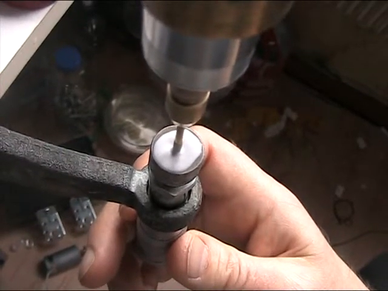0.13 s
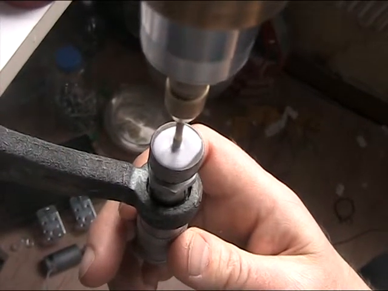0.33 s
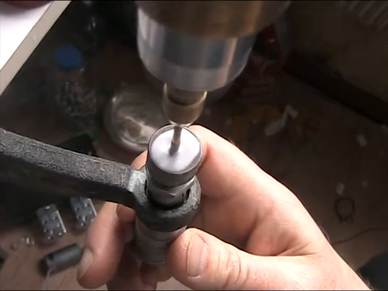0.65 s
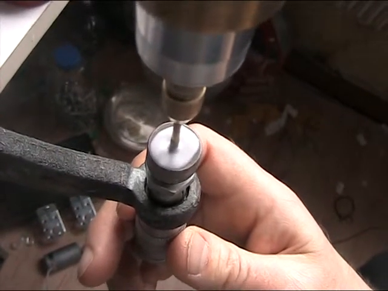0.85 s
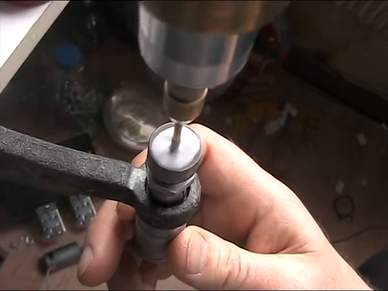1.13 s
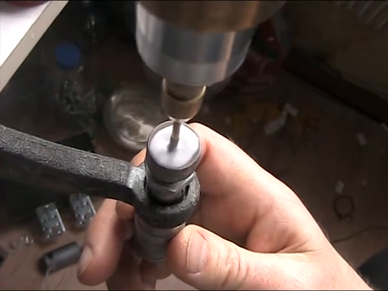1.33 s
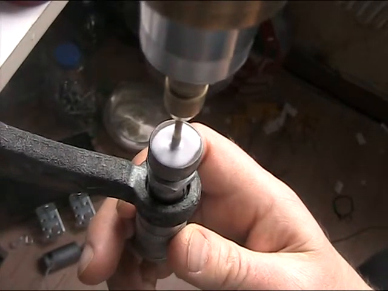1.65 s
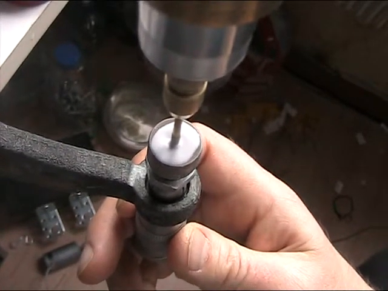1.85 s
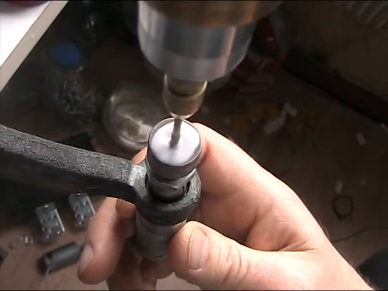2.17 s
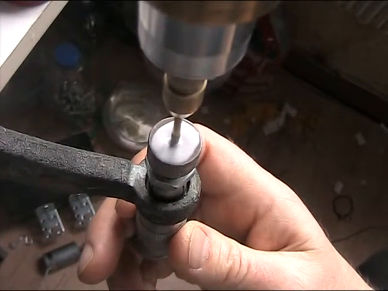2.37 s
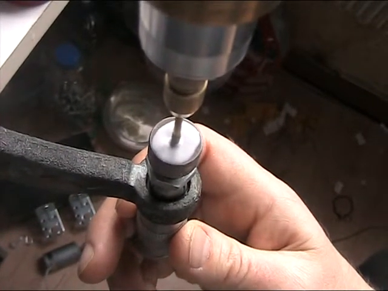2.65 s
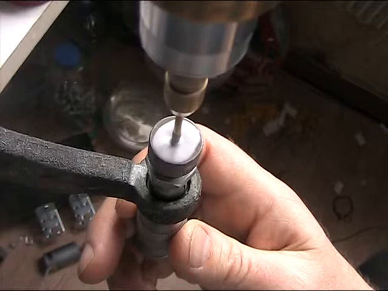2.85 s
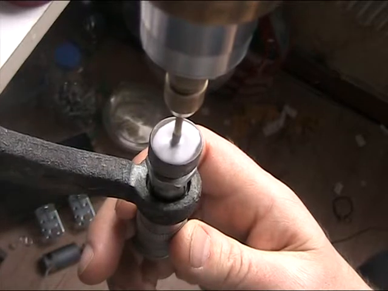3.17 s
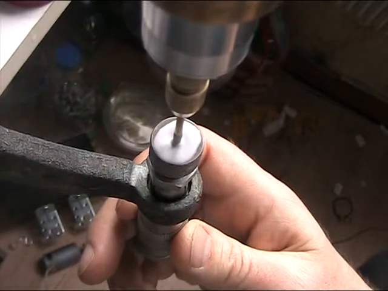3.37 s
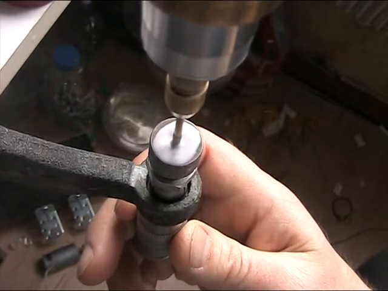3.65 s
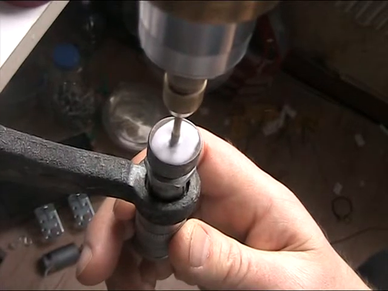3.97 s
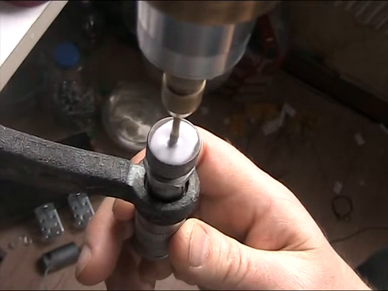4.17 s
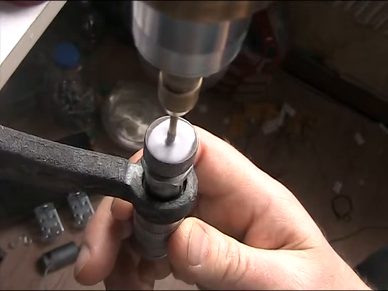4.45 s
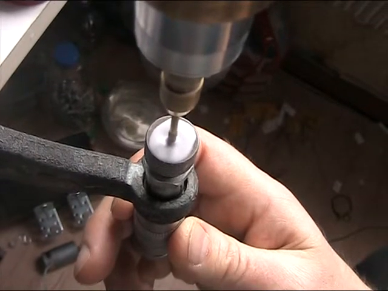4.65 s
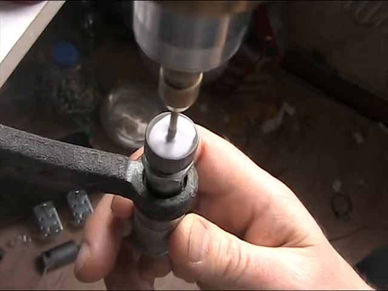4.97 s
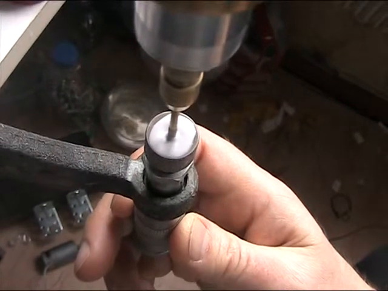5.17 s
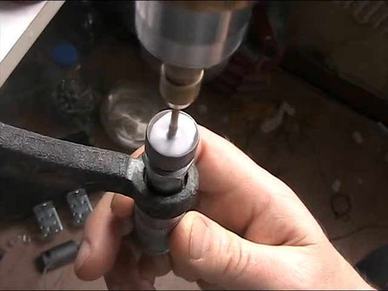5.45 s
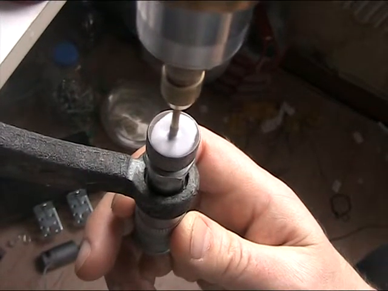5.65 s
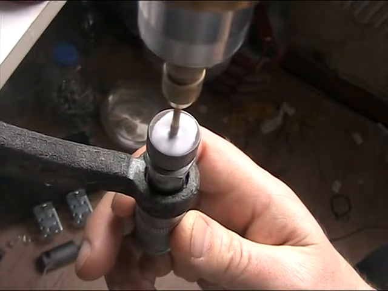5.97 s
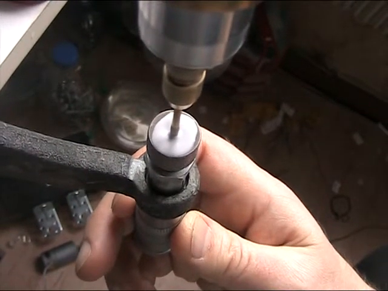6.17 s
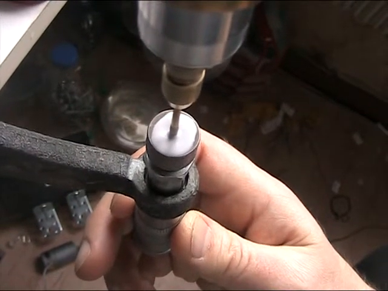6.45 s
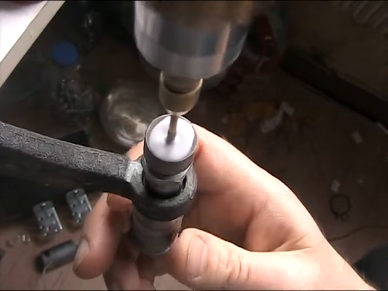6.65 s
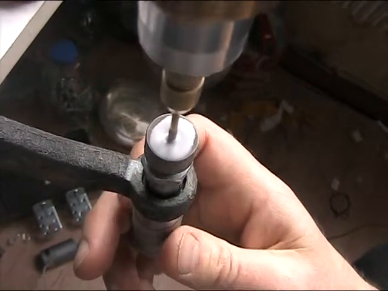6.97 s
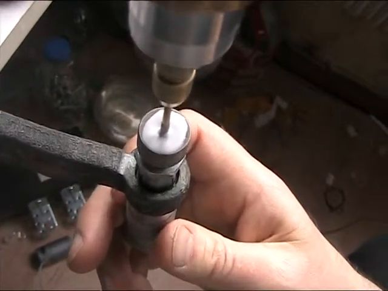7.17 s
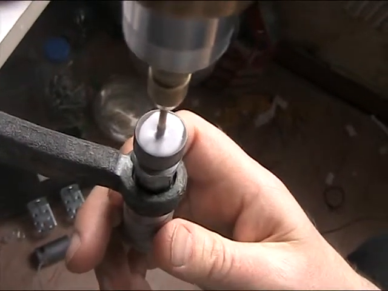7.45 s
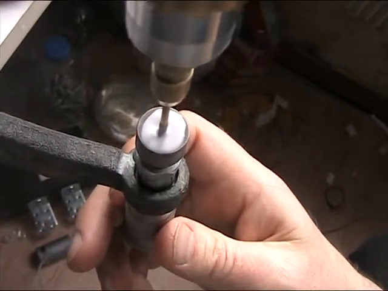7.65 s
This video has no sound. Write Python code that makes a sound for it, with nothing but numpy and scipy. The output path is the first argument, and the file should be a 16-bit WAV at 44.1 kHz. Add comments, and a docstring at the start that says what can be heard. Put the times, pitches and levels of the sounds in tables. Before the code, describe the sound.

A small high-speed drill grinds steadily against stone, a gritty high hiss and thin ringing over a low motor hum.

```python
"""Small drill grinding stone, close up.

A high-speed drill grinds a stone in a water cup on a clamp arm, heard in stereo. The spindle hums at its
turning rate and multiples. Abrasive grains strike the stone in a dense stream, harder on part of each
turn, and ring the chuck, cup and arm. Mains hum lies far below."""
import sys
import numpy as np
from scipy import signal
from scipy.fft import rfft, irfft, next_fast_len
from scipy.io import wavfile

SR = 44100
rng = np.random.default_rng(int(sys.argv[2]) if len(sys.argv) > 2 else 0)


def unload_wav(signal):
    """Save mono or channel-first audio to the path in sys.argv[1] as 16-bit WAV at rate SR, clipped to [-1, 1]."""
    wavfile.write(
        sys.argv[1],
        SR,
        np.round(np.clip(np.atleast_2d(signal).T, -1, 1) * 32767).astype(np.int16),
    )


N = 344509


def amp(db):
    """dB to gain."""
    return 10 ** (np.asarray(db) / 20)


def unit_rms(x):
    """Scale to rms 1."""
    return x / np.sqrt(np.mean(x ** 2) + 1e-20)


def in_time(rows):
    """Columns of a time table, one value per sample."""
    times_s, *columns = np.transpose(rows)
    return [np.interp(np.arange(N) / SR, times_s, column) for column in columns]


def at_hz(rows, hz):
    """Read a table on a log-frequency axis."""
    table_hz, values = np.transpose(rows)
    return np.interp(np.log(hz + 1), np.log(table_hz + 1), values)


def drift(corner_hz):
    """Low-passed random wander, rms 1."""
    hop = 20
    pole = np.exp(-2 * np.pi * corner_hz * hop / SR)
    noise = rng.standard_normal(N // hop + 4002)
    slow = signal.lfilter([1], [1, -2 * pole, pole * pole], noise)[4000:]
    return np.interp(np.arange(N) / hop, np.arange(len(slow)), unit_rms(slow))


def spells(rows, floor_db, edge_s=0.21):
    """Level in dB that swells from a floor, holds and falls back for each row."""
    t = np.arange(N) / SR
    gain = np.full(N, amp(floor_db))
    for start_s, length_s, level_db in rows:
        inside_s = np.minimum(t - start_s, start_s + length_s - t)
        gain = np.maximum(gain, amp(level_db) * np.clip(inside_s / edge_s + 0.5, 0, 1))
    return 20 * np.log10(gain)


def stereo_gains(pan_db, lead_rad):
    """Complex left and right gains."""
    left = amp(pan_db / 2) * np.exp(0.5j * lead_rad)
    return np.array([left, 1 / left])


# Stereo balance: (frequency [Hz], left minus right [dB])
PAN = [(100, -3), (200, -7), (600, -3.5), (3000, -1), (7500, 0), (12500, -2), (13500, -5), (15000, 1.5)]
# Stereo phase: (frequency [Hz], left lead [rad])
LEAD = [(200, -.6), (800, -.1), (1100, .5), (1600, 0), (4800, 0), (5500, .6), (7600, 0), (8300, .8),
        (10300, 0), (12500, .2), (13700, .9), (15500, .7)]


def direct_path(hz):
    """Stereo gains of the direct sound."""
    return stereo_gains(at_hz(PAN, hz), at_hz(LEAD, hz))


def tone(phase, hz, level_db):
    """Stereo sine, placed by its frequency."""
    return np.sqrt(2) * amp(level_db) * np.real(direct_path(hz)[:, None] * np.exp(1j * phase))


# Supply hum lines: (frequency [Hz], level [dB])
MAINS = [(50, -67), (100, -71), (500, -59.5)]


def mains_hum():
    """Faint, unsteady hum of the motor supply."""
    t = np.arange(N) / SR
    return sum(tone(2 * np.pi * hz * t + 0.8 * drift(6), hz, level_db + 3 * drift(8))
               for hz, level_db in MAINS)


# Hum harmonics: (multiple of the turning rate)
HARMONICS = [2, 3, 4, 5, 6, 7, 14, 16]
# Floor of each harmonic: (level [dB])
HARMONIC_FLOORS_DB = [-49.5, -54, -54, -54, -50, -53, -52.5, -47]
# Spells in which a harmonic sings out, by multiple: (start [s], length [s], level [dB])
HARMONIC_SPELLS = {"2": [(0, 0.57, -45), (1.05, .15, -44), (1.5, 1, -48), (2.7, 0.76, -46.5),
                   (4.1, 1.2, -46), (5.55, 2.3, -47)], "3": [(.09, .62, -43.7), (1.04, 0.25, -43.5),
                   (2.55, 0.35, -45), (3.31, 0.6, -46), (4.43, 0.47, -48), (5.41, 0.37, -48),
                   (6.48, 0.64, -49.2), (7.31, 0.68, -43)], "4": [(.08, 0.53, -45.5), (1.42, .78, -48),
                   (3.64, 0.26, -42.5), (5.21, .28, -46), (6.02, 1.15, -48.5), (7.46, .52, -44.2)],
                   "5": [(0, 0.74, -43.5), (.91, 0.51, -48), (1.54, 0.17, -48.7), (3.81, .44, -48),
                   (4.74, 0.64, -46), (5.54, 0.16, -42), (7.46, .52, -45)], "6": [(.11, 0.48, -45.2),
                   (.76, 0.4, -43), (2.12, 0.86, -43), (3.31, .29, -43), (3.61, 0.17, -35.5),
                   (3.86, 0.31, -43), (4.41, 1, -41.5), (5.7, 0.29, -37.5), (5.5, 0.41, -45.5),
                   (6.33, 0.64, -39), (7.46, 0.24, -42.5)], "7": [(.43, 0.65, -43.5), (2.66, 0.13, -39),
                   (4.58, 0.13, -43), (6.64, .31, -44), (7.61, .32, -43.2)], "16": [(1.45, 1.35, -38),
                   (3.15, .25, -47), (6.4, .55, -45)]}


def spindle_hum(angle, mean_hz, fundamental_db):
    """Unbalance and run-out hum at the turning rate and its multiples."""
    waver_db, flutter_db = 0.68, 1.5
    hum = tone(angle + rng.uniform(0, 2 * np.pi), mean_hz, fundamental_db + waver_db * drift(5.1))
    for k, floor_db in zip(HARMONICS, HARMONIC_FLOORS_DB):
        level_db = spells(HARMONIC_SPELLS.get(str(k), []), floor_db) + waver_db * drift(4)
        phase = k * angle + rng.uniform(0, 2 * np.pi)
        hum += tone(phase, k * mean_hz, level_db + (k > 2) * flutter_db * drift(27))
    return hum


# Swells of the low rasp: (start [s], length [s], level [dB])
LOW_RASP_SPELLS = [(0, 0.32, -46), (.42, .28, -41.5), (1.4, 0.88, -46), (3.0, 0.46, -44),
                   (4.05, 0.18, -43.5), (4.74, 0.12, -42), (5.2, 0.59, -48), (6.5, .13, -39),
                   (7.3, .6, -44)]
# The bit bites, the high rasp flares: (start [s], length [s], level [dB])
BITES = [(.1, 0.16, -42), (.42, 0.27, -46), (.95, 0.31, -41), (2.02, 0.11, -44), (3.45, 0.49, -43),
         (4.3, 0.27, -44), (4.75, 0.2, -47), (5.2, .16, -36), (5.85, 0.18, -45), (6.2, 0.33, -45.5),
         (6.68, .08, -46), (6.78, 0.057, -34), (6.85, .08, -44), (7.72, .2, -39.5)]


def spindle_rasp(angle, mean_hz):
    """Upper multiples of the turning rate rasp, wavering in phase and level."""
    low_db = spells(LOW_RASP_SPELLS, floor_db=-51)
    high_db = spells(BITES, floor_db=-61.5, edge_s=0.048)
    return sum(tone(k * angle + 0.68 * drift(22), k * mean_hz, level_db + 1.9 * drift(14))
               for multiples, level_db in (((8, 9), low_db), ((10, 11, 12), high_db))
               for k in multiples)


# Modes of chuck, cup and arm: (frequency [Hz])
MODES_HZ = [2360, 3095, 3180, 3890, 4945, 5480, 5975, 6236, 6735, 7197, 8000, 8322, 8700, 9726, 10265,
            11684]
# Per mode: (width [Hz], relative gain [dB], left minus right [dB], left lead [rad])
MODE_SHAPES = [(164, -9, 1.5, .1), (70, -17.5, -19, 0.48), (80, -3, 1, 0.4), (49, -8.5, -5, .1),
               (18, 1, -4, .2), (218, 1, -3.5, 0.66), (89, 0.5, 2, 0.39), (63, 3.5, -8, 1.16),
               (25, -2, -9, .2), (47, -5, 9, 0.92), (160, -7, 6.5, 0.88), (154, -3.5, -6, 1.1),
               (191, -18, 15, 1.1), (25, 3.5, 2.5, 1.6), (96, -8, -9, .1), (35, -8, 20, 4.3)]


def rig_response(hz):
    """Stereo resonances of chuck, cup and arm."""
    opposed_hz, bass_corner_hz = 10265, 690
    response = 0
    for mode_hz, (width_hz, gain_db, pan_db, lead_rad) in zip(MODES_HZ, MODE_SHAPES):
        sign = -1 if mode_hz == opposed_hz else 1   # one mode swings against its neighbours
        gains = sign * amp(gain_db) * stereo_gains(pan_db, lead_rad)
        response += gains[:, None] / (1 + 2j * (hz - mode_hz) / width_hz)
    return response * hz ** 2 / (hz ** 2 + bass_corner_hz ** 2)   # small parts radiate no bass


# Grit spectrum: (frequency [Hz], relative gain [dB])
GRIT = [(40, -49), (100, -25.5), (300, -26.5), (800, -19.5), (1700, -12), (2200, -9.5), (2900, -10.5),
        (4400, -11.5), (5700, -1.5), (7600, -14), (11000, -15), (13500, -9.5), (14500, 0), (15700, -8.5)]
# Scattered share: (frequency [Hz], gain re direct [dB])
SCATTER = [(60, 0), (300, -5.5), (1000, -6), (2000, -29), (4500, -22), (6000, -8), (7600, -17), (9300, -1),
           (11500, -3), (14500, -17)]
# Notches where paths cancel: (frequency [Hz], width [Hz], depth [0-1])
NOTCHES = [(652, 16, 0.73), (1514, 160, 1), (2983, 65, 0.6), (4640, 220, 0.74), (5020, 290, 0.5),
           (9350, 150, 0.3)]


def grit(hz, direct, scattered):
    """Stereo spectrum of strikes heard directly and scattered off the bench."""
    side = amp(at_hz(SCATTER, hz)) * scattered * [[1], [-1]]
    spectrum = amp(at_hz(GRIT, hz)) * (direct_path(hz) * direct + side)
    for notch_hz, width_hz, depth in NOTCHES:
        spectrum *= 1 - depth / (1 + 2j * (hz - notch_hz) / width_hz)
    return spectrum


def proud_grain(angle, above_hz=1860):
    """One protruding grain ticks once a turn, in stronger and weaker runs."""
    passes = np.diff(np.floor(angle / (2 * np.pi)), prepend=0)
    size_db = 11.5 + 3.5 * drift(3.8) + 3.2 * rng.standard_normal(N)
    return signal.sosfilt(signal.butter(2, above_hz, "high", fs=SR, output="sos"), passes * amp(size_db))


def grains(spread_db, strikes_per_s=9000):
    """Abrasive grains strike at random, with uneven force."""
    sizes = amp(spread_db * np.minimum(rng.exponential(1, N), 5))
    signs = rng.choice([-1, 1], N)
    return unit_rms(sizes * signs * (rng.random(N) < strikes_per_s / SR))


# Contact within a turn: (multiple, depth [dB], phase [rad])
TURN_PATTERN = [(1, 1.5, 0.61), (2, 0.26, 2.5), (3, 1.1, 9.9)]


def pressure(angle, surge_db=0.8):
    """The bit presses harder on part of each turn and in short surges."""
    turn_db = sum(depth_db * np.cos(k * angle + phase) for k, depth_db, phase in TURN_PATTERN)
    return amp(turn_db + surge_db * (drift(34) + drift(170)))


# Grinding effort: (time [s], relative level [dB], dull scrape share [dB; -9.5 is neutral])
GRIND = [(0.0, -22.5, -8.5), (0.2, -21, -9.2), (0.45, -19.5, -10.0), (0.63, -20.5, -13.5),
         (0.75, -22.2, -10.5), (1.2, -20.5, -9), (1.29, -20, -12.5), (1.33, -26.5, -9.5),
         (1.5, -21.9, -10.5), (1.68, -20, -12), (1.93, -22, -11.9), (2.45, -21.5, -10.5),
         (2.95, -21.9, -9.5), (3.3, -20.2, -10), (3.5, -20, -13), (3.68, -20, -10), (3.83, -21.5, -9),
         (3.9, -21.5, -11), (4.1, -23.4, -9.5), (4.5, -20.5, -11), (5.15, -21.5, -11.5), (5.28, -20.5, -10),
         (5.45, -22, -10), (6.1, -22.4, -10.9), (6.72, -21, -13), (6.81, -21, -10), (6.9, -21.5, -13),
         (7.08, -24, -9.5), (7.6, -21.5, -9.5), (7.81, -20, -12.5)]


def strike_forces(angle, slowing_hz):
    """Three independent strike streams; whine and sizzle follow speed more than pressure."""
    level_db, scrape_db = in_time(GRIND)
    swing_db = level_db - level_db.mean()
    whine_db = 0.35 - 0.54 * swing_db - 0.23 * slowing_hz
    sizzle_db = 1.14 - 0.67 * swing_db - 0.32 * slowing_hz
    level_db += 0.5 * drift(26)   # the hand holds the cup unevenly
    scrape_db += 9.5 + 0.5 * drift(7.7)
    whine_db += 0.74 * drift(11)
    sizzle_db += 1.05 * drift(8.8) + 0.38 * drift(73)   # the finest grains come in bursts
    strikes = np.array([grains(3.5) + proud_grain(angle), grains(2.5), grains(1.5)])
    forces = strikes.copy()
    bands = [(2900, "low", scrape_db), ([3010, 3230], "band", whine_db), (10100, "high", sizzle_db)]
    for edge_hz, kind, gain_db in bands:
        band = signal.sosfiltfilt(signal.butter(2, edge_hz, kind, fs=SR, output="sos"), strikes)
        forces += (amp(gain_db) - 1) * band
    return forces * amp(level_db) * pressure(angle)


def grinding(angle, slowing_hz, gain_db=10.5):
    """Strikes on the stone sound as grit and ring the rig."""
    size = next_fast_len(N + 8192)
    hz = np.arange(size // 2 + 1) * SR / size
    direct, ringing, scattered = rfft(strike_forces(angle, slowing_hz), size)
    spectrum = grit(hz, direct, scattered) + rig_response(hz) * ringing
    return amp(gain_db) * irfft(spectrum, size)[:, :N]


# Spindle, slowing under load: (time [s], turning rate [Hz], fundamental level [dB])
SPINDLE = [(0.0, 196.8, -47), (0.5, 190.6, -50.2), (0.71, 186.6, -55), (0.95, 189.9, -52),
           (1.27, 189.6, -52.2), (1.45, 198.4, -48.4), (1.62, 199.8, -48.4), (2.2, 199.0, -48),
           (2.9, 198.0, -50), (3.4, 199.2, -47.5), (3.88, 196.3, -51.2), (4.1, 197.7, -51.4),
           (4.5, 198.7, -46.5), (4.77, 196.5, -54.5), (4.95, 198.5, -51.5), (5.5, 196.9, -52.5),
           (6.05, 200.1, -51.5), (6.4, 200.1, -52.6), (6.62, 198.4, -51.5), (7.0, 199.7, -51),
           (7.55, 197.3, -49.5), (7.81, 194.5, -50.4)]


def scene():
    """Hum, rasp and grinding share one turning angle, over the mains hum."""
    turn_hz, fundamental_db = in_time(SPINDLE)
    angle = 2 * np.pi * np.cumsum(turn_hz) / SR
    spindle = spindle_hum(angle, turn_hz.mean(), fundamental_db) + spindle_rasp(angle, turn_hz.mean())
    return spindle + grinding(angle, turn_hz.max() - turn_hz) + mains_hum()


def record(dry):
    """Soft peak rounding, then a steep low-pass."""
    ceiling, cutoff_hz = 1.6, 15720
    rounded = ceiling * np.tanh(dry / ceiling)
    return signal.sosfilt(signal.ellip(20, 0.3, 90, cutoff_hz, fs=SR, output="sos"), rounded)


dry = scene()
out = record(dry)
unload_wav(out)
```